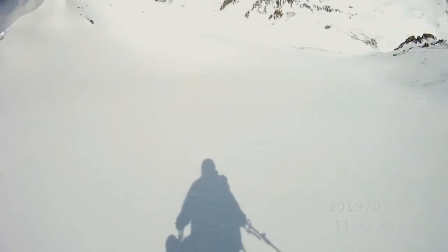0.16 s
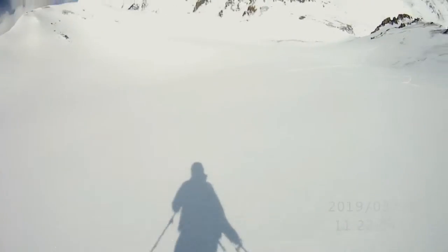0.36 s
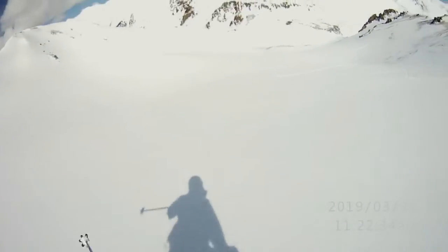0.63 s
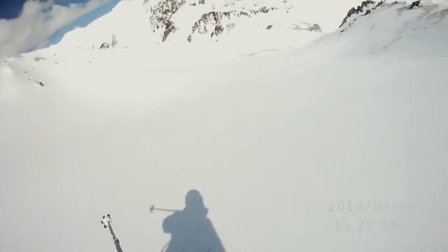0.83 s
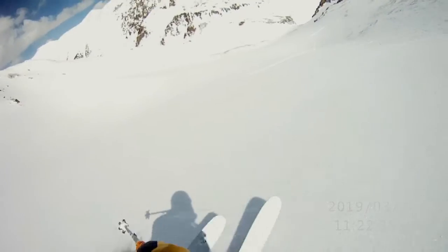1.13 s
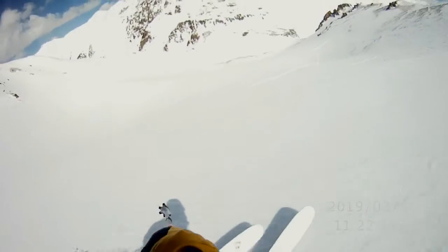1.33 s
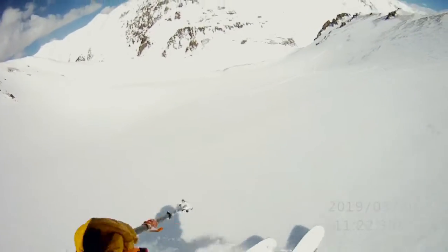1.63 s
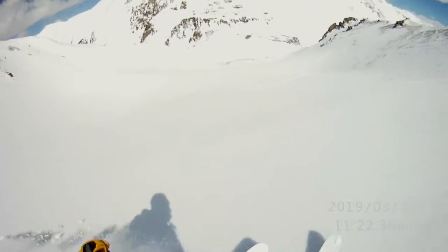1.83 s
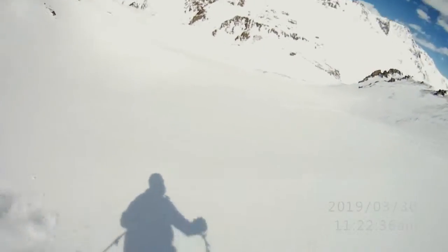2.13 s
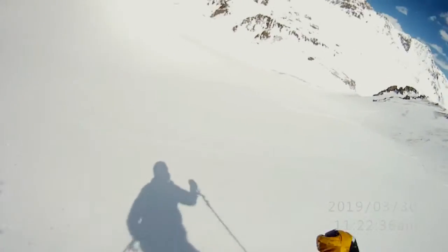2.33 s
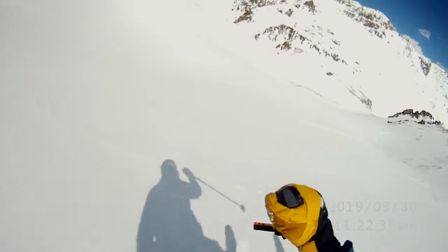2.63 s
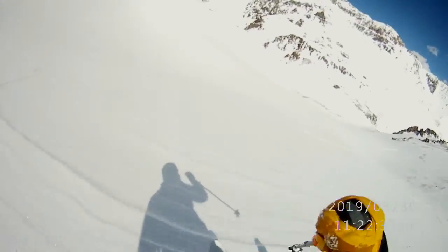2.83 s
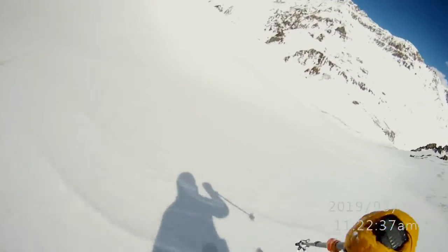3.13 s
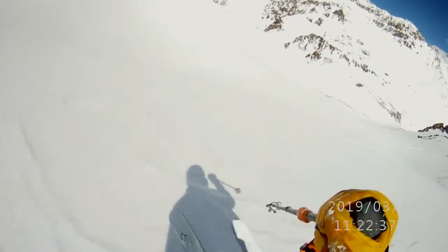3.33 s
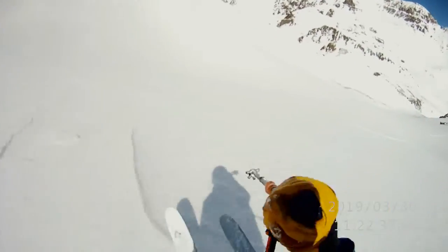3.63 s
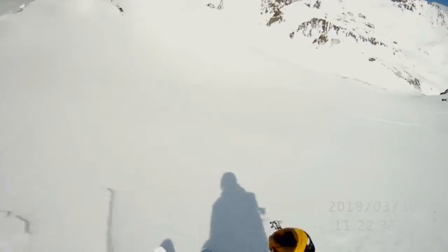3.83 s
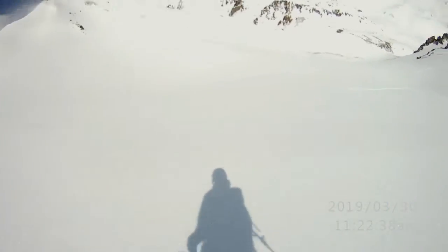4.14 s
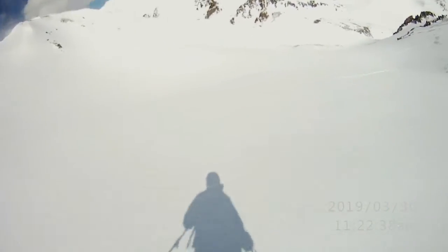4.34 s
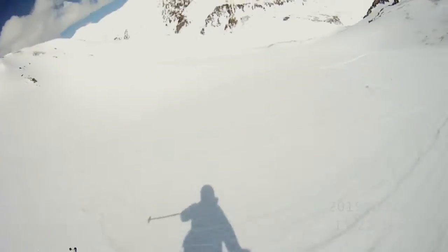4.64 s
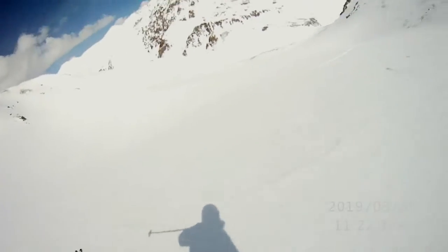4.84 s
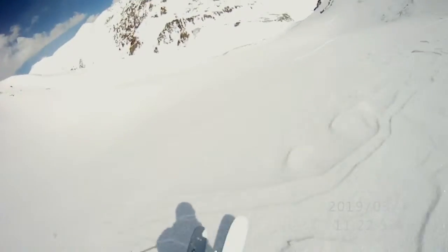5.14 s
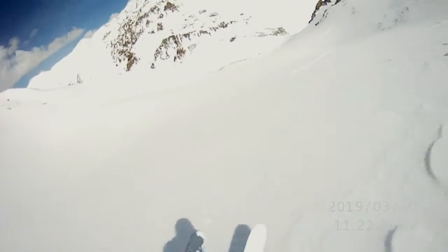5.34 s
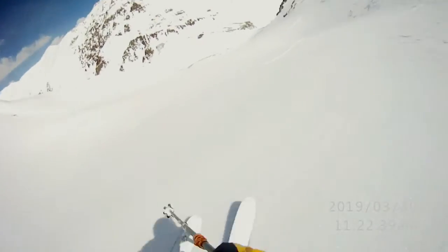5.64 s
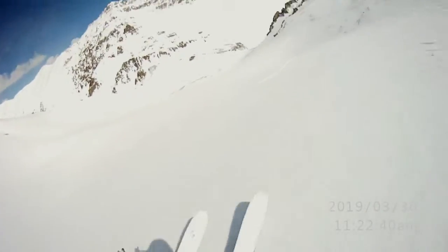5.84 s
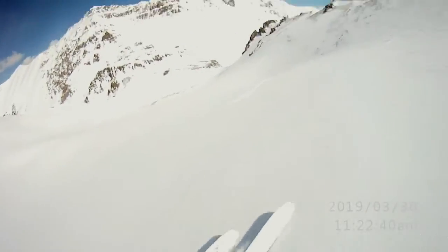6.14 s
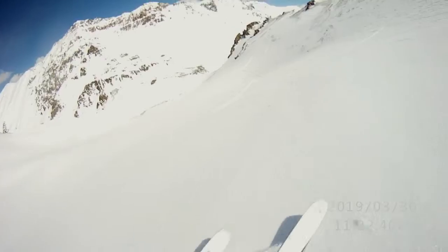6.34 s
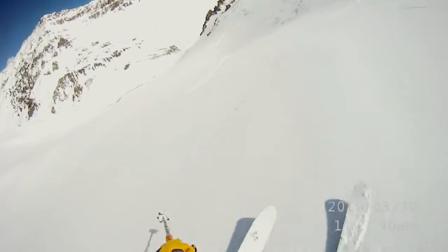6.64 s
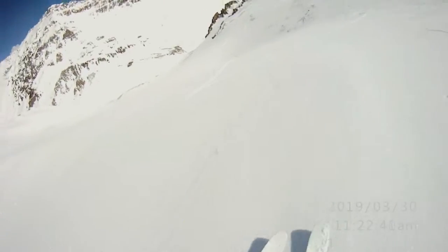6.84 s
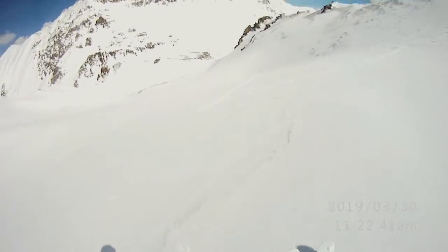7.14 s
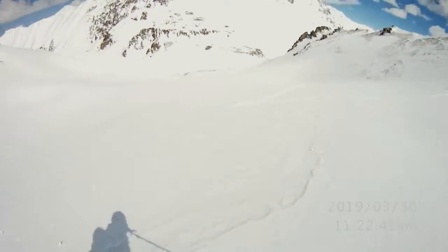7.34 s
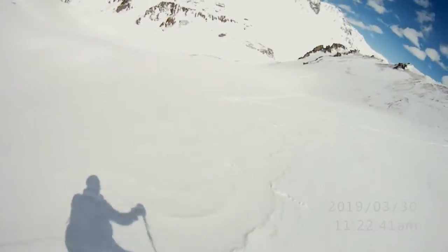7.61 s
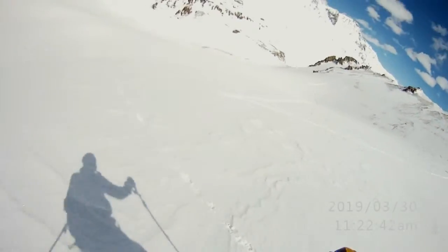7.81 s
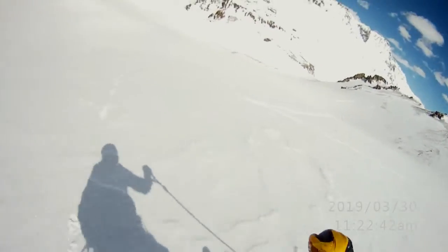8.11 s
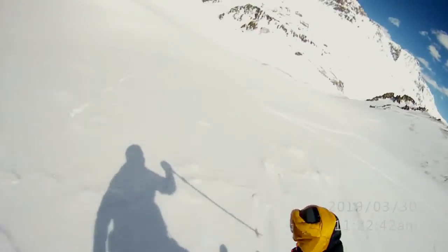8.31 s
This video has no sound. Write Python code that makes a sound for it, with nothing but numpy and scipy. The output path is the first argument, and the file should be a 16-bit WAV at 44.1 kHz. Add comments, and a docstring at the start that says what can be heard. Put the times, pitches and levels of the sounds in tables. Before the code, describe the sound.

Skis hiss through soft snow for about eight and a half seconds, heard from a small helmet microphone with low, fluttering wind throughout. After two light taps in the first second, wind and crunchy swishes swell from 1 to 2 seconds, with a small ski clack at 1.7. At 2.8 seconds something knocks and rubs on the housing, followed by a denser clatter from 3.0 to 3.2, the loudest moment. Swishes follow in quick succession from there, hissing, crunching and sizzling, with a faint rough ringing from the skis and soft hollow whooshes sliding in pitch. The wind is strong from 5 to 6.3 seconds. The skis clack lightly on crust at 5.5 and several times between 6.8 and 7.1, while the wind almost drops away. Gusts return with another turn around 8 seconds. A very faint high whine and hiss lie underneath.

```python
"""Skiing through soft snow

A skier links turns, heard from a small helmet camera. Each push of the skis sets off many tiny impacts
whose sum is hiss, crunch and sizzle; stick-slip friction and lumps of crust make the skis ring.
Turbulence buffets the microphone and hollow whooshes slide in pitch. Something knocks and rubs on the
housing, mostly around three seconds in. Beneath it all lie the camera's faint whine and hiss."""
import sys
import numpy as np
from scipy import signal
from scipy.fft import rfft, irfft, next_fast_len
from scipy.io import wavfile

SR = 44100
rng = np.random.default_rng(int(sys.argv[2]) if len(sys.argv) > 2 else 0)


def master_out(mix):
    """Clip the mix to full scale and print it as 16-bit PCM to the path in sys.argv[1]."""
    frames = np.transpose(np.atleast_2d(mix))
    ceiling = np.clip(frames, -1, 1)
    pcm = np.round(ceiling * 32767).astype(np.int16)
    wavfile.write(sys.argv[1], SR, pcm)


N = 373438
TIME = np.arange(N) / SR
FFT_SIZE = next_fast_len(N, True)
FREQ = np.maximum(np.arange(FFT_SIZE // 2 + 1) * SR / FFT_SIZE, 1)

# one swish per push of the skis: (start [s], rise [s], hold [s], fade [dB/s],
# hiss [dB], crunch [dB], sizzle [dB], treble lift of the hiss [dB])
SWISHES = [(0.0, 0.0027, .06, 47, -53.5, -67, -72, 3.5), (0.33, 0.027, .03, 135, -68, -56, -76, -5),
           (0.515, 0.033, 0.018, 146, -62, -49, -76, -8), (0.838, 0.18, 0.04, 26, -46.5, -62, -57, -2),
           (1.392, 0.063, 0.093, 29.5, -47.5, -45.5, -67, 4.5),
           (1.514, 0.028, 0.009, 131, -40, -44, -52, -2), (2.986, 0.027, 0.041, 60, -47.5, -52, -68, 2.5),
           (3.182, 0.094, 0.23, 112, -46.5, -45, -55.5, 2.5),
           (3.584, 0.051, 0.028, 80, -43.5, -44.5, -53, 2.5),
           (3.874, 0.089, 0.12, 56, -43.5, -47.5, -49, 3), (4.07, 0.02, 0.055, 80, -47, -48, -63, -9),
           (4.447, 0.097, 0.075, 64, -72, -57, -67, -4), (4.756, 0.052, 0.049, 32, -52, -64, -54, 5.5),
           (4.96, 0.11, 0.12, 77, -42.5, -47, -52, 1.5), (5.12, .06, .03, 127, -48, -49, -48, 2),
           (5.23, 0.027, 0.04, 240, -45.5, -44.5, -64, -11),
           (5.621, 0.034, 0.064, 134, -41.5, -39.5, -46, 0.5), (5.787, 0.014, 0.021, 150, -43, -68, -69, 3),
           (5.897, 0.053, .03, 37, -52, -51.5, -57, 5), (6.063, 0.029, 0.019, 116, -48, -48, -59, -1),
           (6.193, 0.025, 0.094, 16, -43.5, -49, -60, 3), (6.255, 0.027, .025, 150, -52, -56, -50, -1),
           (6.347, 0.19, .15, 30, -45.5, -48, -58, 5.5), (6.758, 0.013, 0.014, 103, -44.5, -56, -49, 1),
           (6.84, 0.18, .12, 28, -45, -51.5, -61, -0.5), (7.485, 0.075, .1, 61, -51, -52.5, -64, -14),
           (7.91, 0.24, .07, 58, -52.5, -50.5, -62, 5), (8.18, .003, 0.0043, 700, -62, -60, -48, -2),
           (8.255, 0.024, 0.015, 183, -44, -65, -57, 0), (8.395, .035, 0.025, 64, -49.5, -48, -55, 3.5)]
# the skier rises and the skis go light: (time [s], half-width [s])
UNWEIGHTINGS = [(.62, 0.16), (2.95, 0.025), (4.45, 0.087), (4.715, 0.11), (5.57, 0.05), (7.865, 0.09)]
# loose snow spraying off the skis: (frequency [Hz], spectral level [dB])
SPRAY_SPECTRUM = [(60, 8.5), (300, -3.5), (1800, 1), (2500, 0), (4400, -0.9), (6200, -1.5), (6900, -6),
                  (8500, -4), (10500, -3.5), (11800, -6), (13500, -4), (15500, -10)]
# resonances of the microphone port: (frequency [Hz], width [Hz], lift [dB])
PORT_MODES = [(1610, 120, -1), (3320, 540, 2.5), (5240, 130, 3)]
# snow packing under the bases: (frequency [Hz], spectral level [dB])
CRUNCH_SPECTRUM = [(60, -52), (200, -4), (400, -0.5), (700, -0.5), (900, -3.5), (1400, -6), (1800, -6.5),
                   (2500, -11.5), (6000, -21.5), (15000, -54)]
# ski resonances excited by the crunch: (frequency [Hz], width [Hz], lift [dB])
SKI_MODES = [(415, 140, 2.5), (564, 100, 3), (750, 81, 1.5), (1030, 42, 7.5), (1205, 62, 6.5),
             (1400, 50, 3), (1630, 67, 4), (1810, 70, 0)]
# edges shaving the crust: (frequency [Hz], spectral level [dB])
SIZZLE_SPECTRUM = [(2500, -35), (4200, -3.5), (5000, -3), (5400, 1), (6100, -6.5), (6900, -30), (9000, -47)]
# three resonances of a carving ski: (frequency [Hz], width [Hz])
CARVE_MODES = [(1025, 86), (1215, 54), (1400, 90)]
# their levels, one curve per turn: (time [s], lower [dB], middle [dB], upper [dB])
CARVE_CURVES = [
    [(3.89, -67, -70, -76), (3.95, -58, -64, -68), (4.09, -52, -56, -71), (4.18, -56, -47, -64),
     (4.25, -68, -70, -74)],
    [(4.95, -67, -72, -76), (5.08, -50, -58, -66), (5.28, -52, -58, -64), (5.34, -71.5, -72, -78)],
    [(5.63, -60, -59, -70), (5.668, -39, -40, -56), (5.7, -52, -58, -58), (5.78, -60, -58, -68)],
    [(6.2, -66, -59, -72), (6.6, -58, -55, -64), (6.755, -66, -66, -72), (6.776, -51.5, -56, -61),
     (7.0, -51, -52, -62), (7.13, -51, -56, -64), (7.202, -55, -55, -58), (7.4, -54, -56, -55),
     (7.55, -68, -61, -58), (7.63, -64, -48, -66), (7.69, -56, -50, -66), (7.76, -66, -64, -74)],
]
# skis striking lumps of crust: (time [s], level [dB])
CLACKS = [(1.713, -31.5), (5.553, -35.5), (6.782, -37), (6.842, -33.5), (6.91, -34), (7.143, -38)]
# airflow over the microphone, swelling with speed: (time [s], relative level [dB], corner [Hz])
WIND_CURVE = [(0, -49.5, 240), (.28, -56.5, 170), (.74, -47.5, 200), (.93, -39, 290), (1.06, -41.5, 260),
              (1.36, -46.5, 214), (1.55, -42, 384), (2.12, -48.5, 130), (2.35, -46.5, 133),
              (2.72, -40, 246), (3.3, -40.5, 264), (3.64, -45, 380), (3.96, -53, 330), (4.12, -49.5, 300),
              (4.34, -50, 210), (4.55, -45.5, 210), (4.74, -43, 231), (5.03, -38.5, 390),
              (5.24, -38.5, 320), (5.36, -40, 310), (5.54, -42, 355), (5.73, -38, 380), (6.14, -46.5, 374),
              (6.27, -39, 305), (6.64, -49.5, 202), (7.14, -67.5, 110), (7.55, -51, 170),
              (7.87, -43.5, 203), (7.93, -39.5, 202), (8.05, -38.5, 260), (8.2, -38, 280),
              (8.34, -38.5, 230), (8.47, -45.5, 300)]
# single gusts on the port: (time [s], relative level [dB], width [s], corner [Hz])
PUFFS = [(.11, -45, 0.012, 60), (.872, -36, 0.013, 300), (.885, -35.5, .022, 80), (.98, -42, .025, 180),
         (1.13, -41, 0.01, 200), (1.206, -46, 0.014, 120), (1.31, -37.5, 0.01, 149),
         (1.565, -44, 0.044, 520), (2.088, -41, .012, 150), (2.259, -40, 0.012, 150),
         (2.54, -46, 0.016, 383), (2.715, -34.5, 0.012, 199), (2.765, -39, 0.018, 190),
         (2.797, -25.5, 0.0061, 191), (3.179, -23, 0.009, 240), (3.235, -38.5, 0.021, 150),
         (3.425, -33, 0.0065, 197), (4.811, -39, 0.019, 220), (5.055, -36, 0.049, 560),
         (5.24, -44, 0.034, 200), (5.745, -35, 0.014, 200), (5.96, -41, .012, 150),
         (6.33, -42.5, 0.063, 200), (7.689, -45.5, 0.026, 119), (8.05, -38.5, 0.01, 450),
         (8.21, -39, 0.012, 330), (8.31, -47, 0.024, 131.5)]
# sliding noise bands, one curve per whoosh: (time [s], centre [Hz], relative level [dB])
WHOOSH_CURVES = [
    [(1.43, 300, -62), (1.55, 408.5, -45), (1.63, 412, -49), (1.75, 352, -62)],
    [(4.36, 240, -71), (4.56, 340, -50), (4.72, 380, -56), (4.88, 562.4, -52), (5.06, 470, -42),
     (5.3, 428, -59), (5.5, 480, -65.5)],
    [(6.065, 562, -58), (6.09, 683, -45), (6.125, 830, -50), (6.15, 880, -60)],
    [(6.51, 739, -62), (6.55, 560, -52), (6.6, 271.5, -48), (6.65, 424, -58), (6.71, 620, -46),
     (6.76, 740, -63)],
    [(6.9, 558, -64), (7.04, 720, -53), (7.14, 640, -50), (7.25, 746, -54), (7.5, 760, -57)],
]
# knocks on the housing: (time [s], peak [dB], pitch [Hz], shell crack [dB])
KNOCKS = [(.301, -38, 320, -56), (0.5835, -26.5, 317, -70), (2.398, -32, 300, -67), (2.7868, -26, 620, -56),
          (2.789, -17, 200, -65), (2.7938, -16.5, 650, -41.5), (2.7967, -19, 380, -60),
          (2.8013, -16, 380, -43), (2.8044, -28, 420, -50), (2.847, -36, 1100, -50), (2.851, -33, 850, -65),
          (2.8543, -35, 1200, -67), (3.0482, -11.5, 470, -38), (3.055, -25, 500, -60),
          (3.083, -11, 600, -48), (3.0849, -14, 850, -50), (3.0923, -10, 1250, -49), (3.0944, -4, 600, -29),
          (3.0955, -13, 1490, -38), (3.0971, -9, 750, -26), (3.0986, -1, 1520, -19),
          (3.1027, -25, 1700, -38), (3.1092, -26, 1900, -50), (3.124, -12, 746, -34),
          (3.1371, -22, 478, -55), (3.143, -24, 350, -55), (3.1652, -15.5, 282, -55),
          (3.1679, -17, 1200, -51), (3.1728, -14, 330, -52), (3.1763, -15, 440, -55),
          (3.184, -7.5, 457, -50), (3.1857, -19, 990, -46), (3.1877, -11.5, 1140, -33),
          (3.1891, -14, 750, -40), (3.4195, -17, 500, -57)]
# stiff resonances of the shell: (frequency [Hz], relative level [dB], 60 dB decay time [s])
SHELL_MODES = [(1490, 3, 0.017), (2100, 3, .004), (2800, -2, 0.0063), (3830, 2.5, 0.0048),
               (4860, -1, 0.0059), (6800, -3.5, 0.0035), (10500, -11, 0.0027)]
# rubs on the housing: (start [s], length [s], level [dB])
RUBS = [(2.784, 0.027, -31.5), (3.03, 0.027, -31.5), (3.08, 0.034, -27), (3.1, 0.021, -27),
        (3.122, 0.04, -29), (3.162, 0.034, -31.5)]
# rubbing common to both ports: (frequency [Hz], spectral level [dB])
RUB_MID_SPECTRUM = [(40, -18), (150, 5.5), (280, -9), (450, 2.5), (750, -15), (1000, -10), (1600, -18),
                    (2500, -26), (5000, -41), (15000, -51)]
# rubbing that differs between the ports: (frequency [Hz], spectral level [dB])
RUB_SIDE_SPECTRUM = [(20, -12), (60, 3), (150, -4), (400, 2), (1000, -1), (2000, -5), (4000, -9),
                     (8000, -15), (15000, -24)]
# self-noise of each microphone: (frequency [Hz], spectral level [dB])
MIC_SPECTRUM = [(100, -17), (300, -8), (700, -1), (1500, -3), (3000, -8.5), (8000, 16.5), (15000, 7)]


def ski_levels(glide_hiss_db=-53.5, glide_crunch_db=-59, glide_lift_db=2.3):
    """Incoherent sources add in power: glide plus swishes give hiss, crunch, sizzle and lift in dB."""
    lightness = sum(np.exp(-((TIME - s) / width) ** 2) for s, width in UNWEIGHTINGS)
    hiss = from_db(glide_hiss_db - 1.5 * lightness) ** 2   # light skis glide more quietly
    treble = hiss * from_db(glide_lift_db - 3 * lightness) ** 2   # and sound duller
    packing, edge = from_db(glide_crunch_db) ** 2, 1e-12
    for start, rise, hold, fade, hiss_db, crunch_db, sizzle_db, lift_db in SWISHES:
        age = TIME - start
        push = np.clip(age / rise, 0, 1) * from_db(-fade * np.maximum(age - rise - hold, 0))
        hiss += (push * from_db(hiss_db)) ** 2
        treble += (push * from_db(hiss_db + lift_db)) ** 2
        packing += (push * from_db(crunch_db)) ** 2
        edge += (push * from_db(sizzle_db)) ** 2
    return 10 * np.log10([hiss, packing, edge, treble / hiss])


def spray(hiss_db, lift_db, flutter_db=0.84):
    """Shot noise: countless fine grains merge into a hiss, brighter when the powder flies."""
    hiss = colour(grains(per_s=24000, spread_db=2), spectrum_db(SPRAY_SPECTRUM) + peaks_db(PORT_MODES))
    treble = filtered(hiss, np.clip(np.log2(FREQ / 4100), 0, 1))
    lifted = hiss + (from_db(lift_db) - 1) * treble
    return lifted * from_db(hiss_db + flutter_db * drift(22))


def body_echoes(direct, echo_gain=0.091, sway=0.044):
    """Comb filtering: reflections off arms and slope, on swaying paths, interfere with the direct sound."""
    out = direct.copy()
    for delay_s in (.0013, .0031, .0062):
        swaying_delay = delay_s * (1 + sway * drift(0.88))
        out += echo_gain * np.interp(TIME - swaying_delay, TIME, direct)
    return out / np.sqrt(1 + 2 * echo_gain ** 2)


def crunch(level_db, judder_db=2):
    """Forced vibration: snow collapsing in coarse grains drives the modes of the juddering skis."""
    body_db = spectrum_db(CRUNCH_SPECTRUM) + peaks_db(SKI_MODES)
    packing = colour(grains(per_s=2200, spread_db=2.5), body_db)
    return packing * from_db(level_db + judder_db * drift(24))


def sizzle(level_db, flutter_db=3):
    """Abrasion: the edges shave tiny crystals off the crust in quick, uneven spurts."""
    shaving = colour(grains(per_s=5000, spread_db=1.5), spectrum_db(SIZZLE_SPECTRUM))
    return shaving * from_db(level_db + flutter_db * drift(34))


def carve(rough_db=1.5, flex=0.01184):
    """Stick-slip friction on the edge keeps the ski ringing roughly; its modes waver as it flexes."""
    gains = sum(from_db(in_time(turn)) * during(turn) for turn in CARVE_CURVES)
    bend = 1 + flex * drift(7.01)
    ringing = sum(gain * narrow_noise(hz * bend, width) for (hz, width), gain in zip(CARVE_MODES, gains))
    return ringing * unit_rms(from_db(rough_db * drift(60)))


def clacks(crack_db=-5, ring_hz=1170, t60_s=0.032):
    """Brittle fracture: a lump of crust cracks and leaves the ski in free, decaying vibration."""
    lowpass_db = -10 * np.log10(1 + (FREQ / 3500) ** 2)
    crack = colour(rng.standard_normal(N), spectrum_db(SPRAY_SPECTRUM) + lowpass_db)
    out = np.zeros(N)
    for start, db in CLACKS:
        near, age = time_after(start, length_s=0.2)
        ring = np.sin(2 * np.pi * ring_hz * age)
        out[near] += (ring + from_db(crack_db) * crack[near]) * from_db(db - 60 * age / t60_s)
    return out


def wind(slope=3.02, gust_db=1.3, eddy_db=1.43, trim_db=-3, rumble_hz=40):
    """Turbulence at the port: a power law falls above the corner, and each eddy size flickers alone."""
    level_db, corner_hz = in_time(WIND_CURVE)
    white = rfft(rng.standard_normal(N), FFT_SIZE)
    out = np.zeros(N)
    for hz in np.geomspace(20, 5120, 13):
        band = np.maximum(1 - 1.5 * np.abs(np.log2(FREQ / hz)), 0)   # triangles 2/3 octave apart
        eddies = irfft(white * band, FFT_SIZE)[:N]
        rumble = 1 + rumble_hz / (hz + rumble_hz)
        power = SR / 2 / corner_hz * rumble / (1 + (hz / corner_hz) ** slope)
        hump_db = 0.5 * np.exp(-(2 * np.log2(hz / corner_hz)) ** 2)
        out += eddies * np.sqrt(power) * from_db(hump_db + eddy_db * drift(32))
    return out * from_db(level_db + trim_db + gust_db * drift(11.5))


def puffs(band_ratio=3.85, trim_db=-2):
    """Pressure pulses: large eddies strike the port singly; faster ones reach higher frequencies."""
    out = np.zeros(N)
    for s, db, width_s, corner_hz in PUFFS:
        centre = int(s * SR)
        near = slice(max(centre - SR // 8, 0), centre + SR // 8)
        swell = np.exp(-((TIME[near] - s) / width_s) ** 2 / 2)
        band = signal.butter(3, [corner_hz / band_ratio, corner_hz], "band", fs=SR, output="sos")
        eddy = swell * signal.sosfilt(band, rng.standard_normal(SR // 2))[-len(swell):]
        out[near] += from_db(db + trim_db) * unit_rms(eddy) * np.sqrt(np.mean(swell ** 2))
    return out


def whooshes(width_hz=75, trim_db=-4):
    """Narrow-band noise has a hollow pitch, which slides up and down through the turn."""
    out = np.zeros(N)
    for sweep in WHOOSH_CURVES:
        hz, db = in_time(sweep)
        out += from_db(db + trim_db) * during(sweep) * narrow_noise(hz, width_hz)
    return out


def knocks(contact_cycles=0.16, t60_cycles=2.95, port_spread=0.21):
    """Impulse response: the damped housing swings briefly; its shell modes reach each port unequally."""
    out = np.zeros((2, N))
    for start, peak_db, hz, crack_db in KNOCKS:
        near, age = time_after(start, length_s=0.05)
        cycles = hz * age
        onset = 1 - np.exp(-(cycles / contact_cycles) ** 2)   # the force builds up over the contact
        swing = onset * np.sin(2 * np.pi * cycles) * from_db(-60 * cycles / t60_cycles)
        out[:, near] += from_db(peak_db) * swing / np.abs(swing).max()
        for mode_hz, mode_db, t60_s in SHELL_MODES:
            mode = np.sin(2 * np.pi * mode_hz * age) * from_db(crack_db + mode_db - 60 * age / t60_s)
            lean = port_spread * rng.standard_normal()
            out[:, near] += mode * [[1 + lean], [1 - lean]]
    return out


def rubs(ramp_s=0.0059, side_db=-14):
    """Sliding friction: uneven slips on the housing, so close that the two ports hear them differently."""
    pressure = np.zeros(N)
    for start, length, db in RUBS:
        inside_s = np.minimum(TIME - start, start + length - TIME)
        pressure += from_db(db) * np.clip(inside_s / ramp_s, 0, 1)
    mid = colour(grains(per_s=2000, spread_db=2.5), spectrum_db(RUB_MID_SPECTRUM))
    side = colour(grains(per_s=2800, spread_db=8), spectrum_db(RUB_SIDE_SPECTRUM))
    return pressure * (mid + from_db(side_db) * side * [[1], [-1]])


def whine(hz=11100, waver_hz=4, rms_db=-72):
    """Random frequency modulation makes the camera's faint electronic tone waver."""
    phase = 2 * np.pi * np.cumsum(hz + waver_hz * drift(12)) / SR
    return from_db(rms_db) * np.sqrt(2) * np.sin(phase)


def mic_hiss(rms_db=-71.5):
    """Self-noise: the two microphones hiss faintly, uncorrelated with each other."""
    return from_db(rms_db) * colour(rng.standard_normal((2, N)), spectrum_db(MIC_SPECTRUM))


def grains(per_s, spread_db):
    """A Poisson process: impulses of random time, size and sign, at unit rms."""
    sizes = from_db(spread_db * np.minimum(rng.exponential(1, N), 4))
    hits = rng.random(N) < per_s / SR
    return unit_rms(hits * sizes * rng.choice([-1, 1], N))


def drift(rate_hz):
    """Low-passed noise of unit rms: a smooth fluctuation with little above rate_hz."""
    step, settle = 40, 2000   # audio samples per point; points dropped while the filter settles
    pole = np.exp(-2 * np.pi * rate_hz * step / SR)
    white = rng.standard_normal(N // step + settle + 2)
    slow = signal.lfilter([1], [1, -2 * pole, pole * pole], white)[settle:]
    return np.interp(np.arange(N) / step, np.arange(len(slow)), unit_rms(slow))


def narrow_noise(hz, width_hz):
    """Quadrature modulation: two slow noises form a band about a moving centre."""
    phase = 2 * np.pi * np.cumsum(hz) / SR
    return drift(width_hz) * np.cos(phase) + drift(width_hz) * np.sin(phase)


def spectrum_db(points):
    """Interpolation of (frequency [Hz], level [dB]) points on a log-frequency axis."""
    hz, db = np.transpose(points)
    return np.interp(np.log(FREQ), np.log(hz), db)


def peaks_db(modes):
    """Resonances as Lorentzian humps on a decibel spectrum."""
    return sum(db / (1 + (2 * (FREQ - hz) / width) ** 2) for hz, width, db in modes)


def filtered(x, gain):
    """Linear filtering: one gain per frequency."""
    return irfft(rfft(x, FFT_SIZE) * gain, FFT_SIZE)[..., :N]


def colour(x, db):
    """Spectral shaping, at unit rms."""
    return unit_rms(filtered(x, from_db(db)))


def in_time(rows):
    """Linear interpolation of each column against the first, time."""
    times, *columns = np.transpose(rows)
    return [np.interp(TIME, times, column) for column in columns]


def during(rows):
    """A rectangular window from the first to the last point of a curve."""
    return (TIME > rows[0][0]) & (TIME < rows[-1][0])


def time_after(start_s, length_s):
    """The samples that follow an impact, and their age in seconds."""
    first = int(start_s * SR)
    near = slice(first, first + int(length_s * SR))
    return near, np.maximum(TIME[near] - start_s, 0)


def from_db(db):
    """Decibels to amplitude ratio."""
    return 10 ** (np.asarray(db) / 20)


def unit_rms(x):
    """Normalisation to unit power."""
    return x / np.sqrt(np.mean(x ** 2) + 1e-20)


def scene():
    """Superposition: skis and wind are centred; only shell cracks, rubs and self-noise have width."""
    hiss_db, crunch_db, sizzle_db, lift_db = ski_levels()
    snow = body_echoes(spray(hiss_db, lift_db)) + crunch(crunch_db) + sizzle(sizzle_db)
    skis = snow + carve() + clacks()
    noise_floor = mic_hiss()
    air = wind() + whooshes() + puffs()
    return skis + air + knocks() + rubs() + whine() + noise_floor


def record(dry):
    """Band limiting and saturation: the camera drops deep rumble, rounds peaks and cuts the top."""
    low_hz, high_hz = 12, 15450
    highpass = signal.butter(2, low_hz, "high", fs=SR, output="sos")
    lowpass = signal.ellip(12, .1, 80, high_hz, fs=SR, output="sos")
    rounded = np.tanh(signal.sosfilt(highpass, dry))
    return signal.sosfilt(lowpass, rounded)


dry = scene()
out = record(dry)
master_out(out)
```